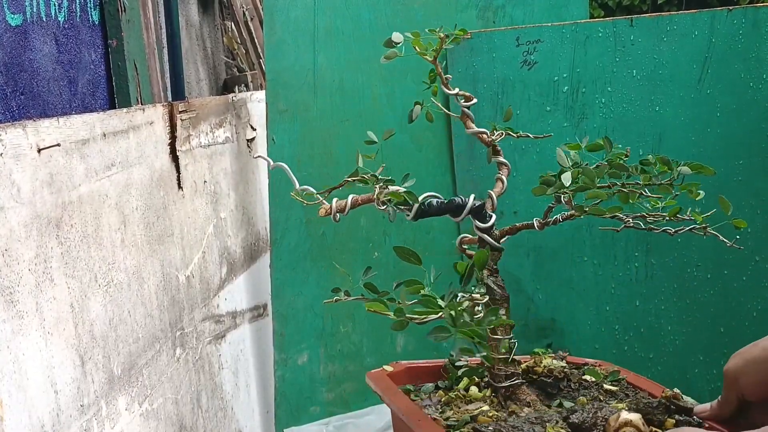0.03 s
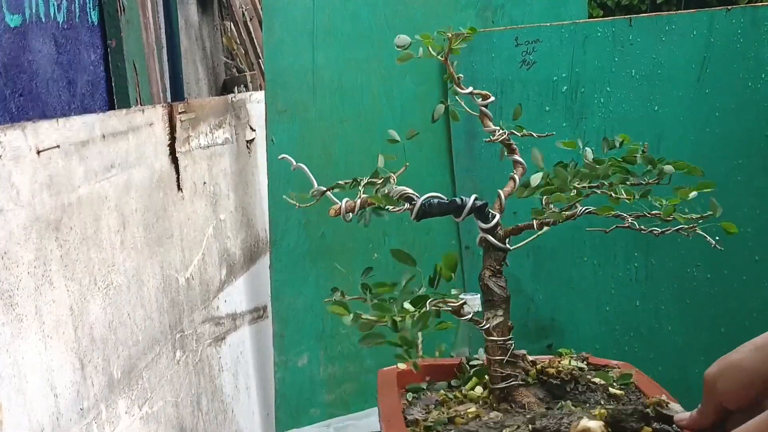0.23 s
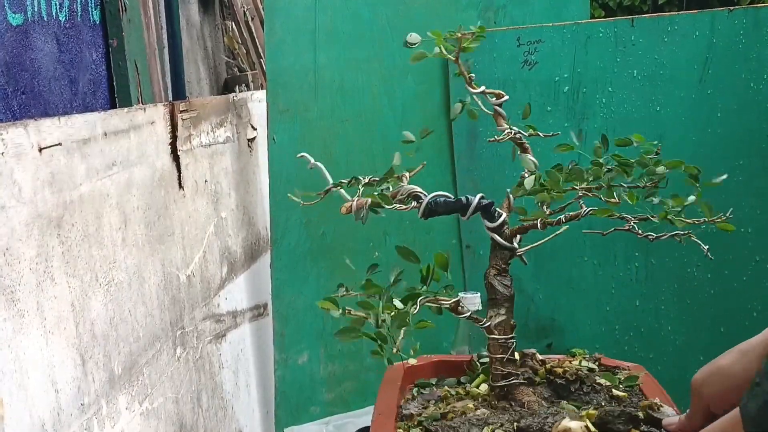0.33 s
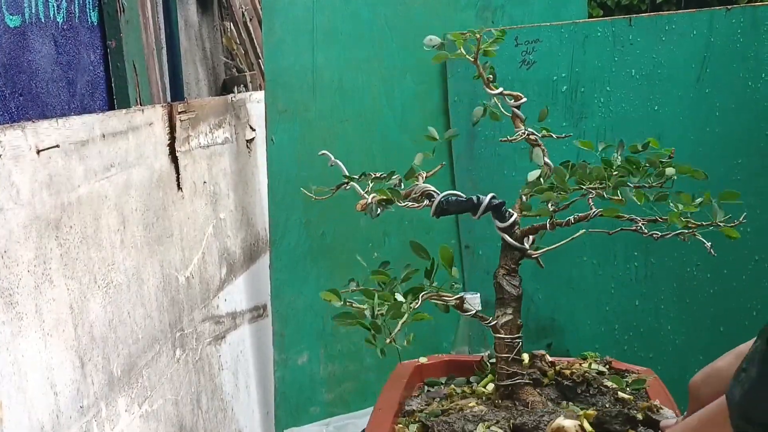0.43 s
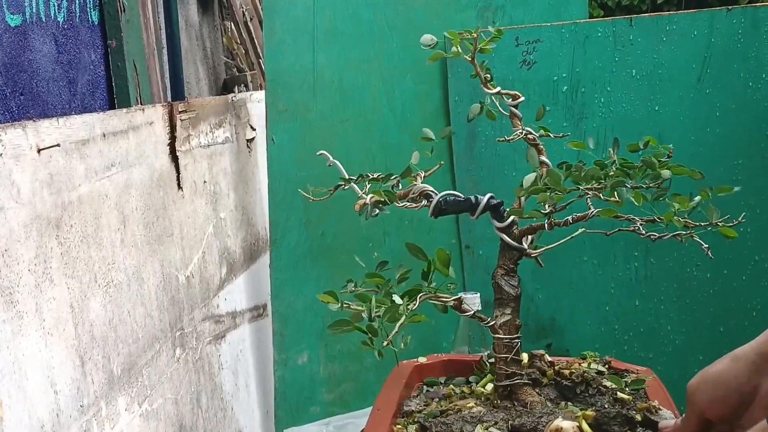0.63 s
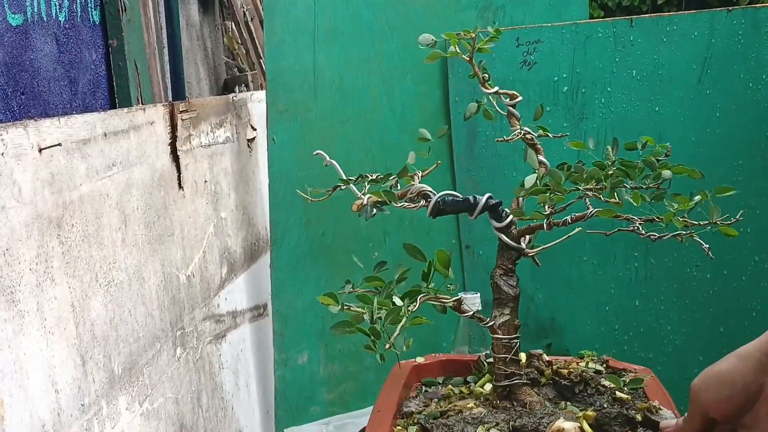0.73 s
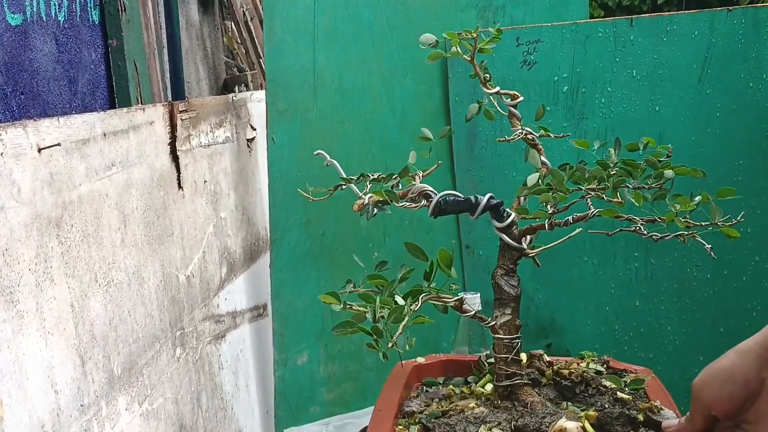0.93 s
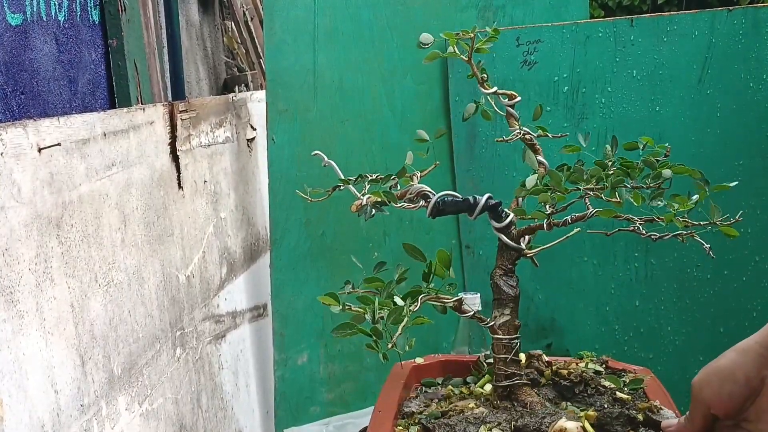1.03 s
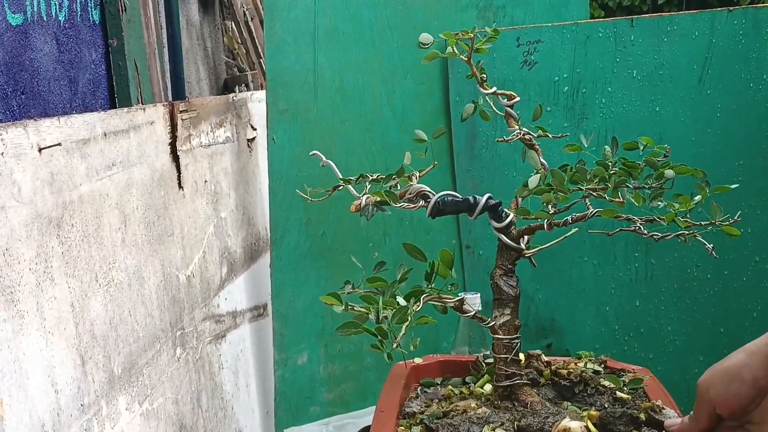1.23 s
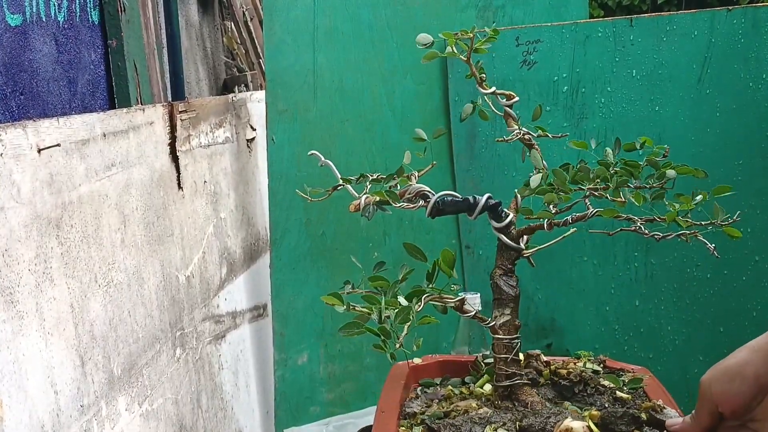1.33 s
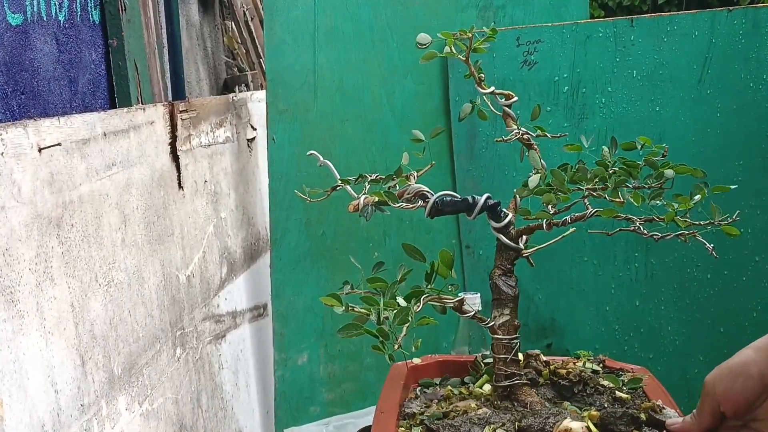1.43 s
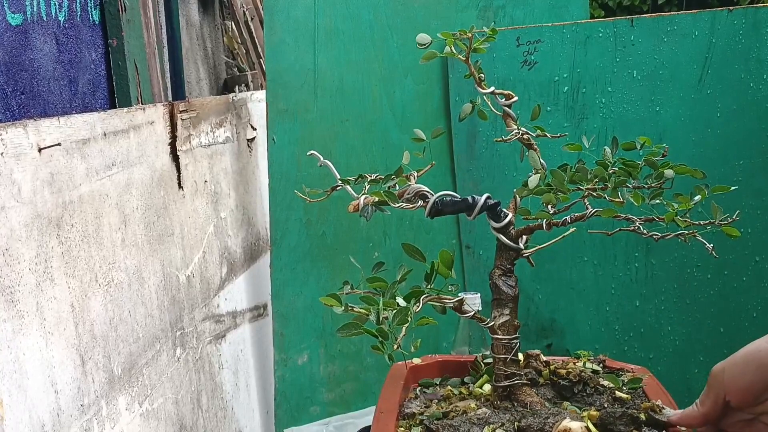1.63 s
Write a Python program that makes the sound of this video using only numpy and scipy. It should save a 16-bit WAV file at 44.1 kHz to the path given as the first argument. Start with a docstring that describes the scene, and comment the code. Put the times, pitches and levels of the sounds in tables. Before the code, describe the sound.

A soil-filled plant pot is set down on a table with one sharp knock, a gritty crack over a brief low boom. Before and after, its base judders and scrapes faintly, close by, over quiet room noise.

```python
"""A room with a table: a plant pot full of soil is shifted and set down with one sharp knock. The gritty base
cracks against the top, the table booms in its low modes, pot and room ring briefly. Before and after, the
turning base sticks and slips in soft judders and rubs over grit; the hand adds faint scrapes and the leaves
rustle. Gain control ducks the room noise under the knock and lets it creep back."""
import sys
import numpy as np
from scipy import signal
from scipy.fft import rfft, irfft
from scipy.io import wavfile
from scipy.ndimage import minimum_filter1d

SR = 44100
rng = np.random.default_rng(int(sys.argv[2]) if len(sys.argv) > 2 else 0)


def master(y):
    """Save y as 16-bit WAV."""
    cut = np.clip(np.atleast_2d(y).T, -1, 1)
    pcm = np.round(cut * 32767)  # scale
    wavfile.write(sys.argv[1], SR, pcm.astype(np.int16))


N = 74970
KNOCK_S, CUTOFF_HZ = 0.2492, 15900
SIDES = np.array([[1], [-1]])  # left, right

# Base contacts: after_knock_s, relative_db
BASE_CONTACTS = [(-.0019, -16.5), (-.0009, -16), (0.0, -2), (.0007, -3.5), (.0017, -8.5), (.004, -11.5),
                 (0.0147, -15.5), (0.028, -22)]
# Crack spectrum: freq_hz, density_db
CRACK_SPECTRUM = [(300, -14), (600, 0), (1000, -7.5), (1480, 0.5), (2060, -7.5), (2720, 1.5), (3270, -11),
                  (3900, 2), (4630, -7), (5580, -4), (6740, -11), (8000, -6), (9260, -7), (10100, -23),
                  (13100, -28), (15800, -27)]
# Uneven radiation of the pot: freq_hz, left_minus_right_db
POT_PAN = [(120, -1), (300, 1), (470, 1), (620, -5), (850, -2), (1400, 1.5), (2700, 2), (3800, -3.5),
           (5500, -1), (6400, -2), (7000, 0), (7900, -5), (9200, 2), (12000, 0)]


def base_crack():
    """Each contact of the gritty base is a bright burst of a few milliseconds."""
    attack_s, t60_s, low_cut_hz, gain_db = 0.00039, 0.006, 344, 4
    bursts = 0
    for after_knock_s, relative_db in BASE_CONTACTS:
        t = since(KNOCK_S + after_knock_s)
        bursts += from_db(relative_db) * ramp(t, attack_s) * decay(t, t60_s)
    grit = sum(band for _, band in noise_bands(CRACK_SPECTRUM, POT_PAN))
    highpass = signal.butter(2, low_cut_hz, "high", fs=SR, output="sos")
    return from_db(gain_db) * signal.sosfilt(highpass, bursts * grit + 1e-18)


# Loaded table top: pitch_hz, relative_db, t60_s
TABLE_TOP_MODES = [(111.3, -9, 0.2), (125.6, -13.5, 0.47), (145, -40, 0.037), (158.5, 2.5, 0.047),
                   (201.2, -10, 0.19), (338.6, -15.5, 0.25), (442.5, -16.5, 0.13), (480.4, -27, 0.47)]


def table_boom():
    """The pot's weight drives the table's low modes, neighbours in opposite directions."""
    lead_s, build_s, gain_db = 0.0019, 0.01, 5
    t = since(KNOCK_S - lead_s)
    modes = sum((-1) ** k * from_db(db) * ring_out(t, hz, t60_s) * np.sin(2 * np.pi * hz * t)
                for k, (hz, db, t60_s) in enumerate(TABLE_TOP_MODES))
    return from_db(gain_db) * ramp(t, build_s) * modes


# Pot modes: pitch_hz, relative_db, t60_s
POT_BODY_MODES = [(638, -14, .25), (711, -13, .22), (819, -10, .22), (908, -8, .22), (1010, -10, .22),
                  (1364, -3, .18), (1495, -4, .17), (1722, -5, .18), (1947, -7, .18), (2321, -3, .18),
                  (2730, -4, .15), (2820, -3, .15), (3650, -6, .12), (6410, -11, .14)]
# Dense ring of pot and room: freq_hz, density_db
RING_SPECTRUM = [(50, -8), (150, 3), (300, 1), (450, 3.5), (580, -4), (900, -2), (1100, -6), (1450, -1.5),
                 (2100, -8), (2750, -6), (3200, -14), (3900, -10.5), (4700, -15), (5500, -10), (8000, -16),
                 (9500, -16.5), (10000, -21), (13000, -32), (15500, -25)]
# Dense ring decay: freq_hz, t60_s
RING_DECAY = [(100, 0.46), (500, 0.29), (1500, .22), (4000, 0.22), (8000, 0.23), (15000, 0.23)]


def pot_ring():
    """The pot's modes reach the two sides out of step, inside a dense ring of pot and room."""
    modes_gain_db, dense_gain_db, build_s = -17.5, -8.5, 0.0075
    t = since(KNOCK_S)
    modes = 0
    for k, (hz, db, t60_s) in enumerate(POT_BODY_MODES):
        gain = from_db(modes_gain_db + db + SIDES * at_hz(POT_PAN, hz) / 2)
        apart_rad = (-1) ** k * np.arccos(at_hz(STEREO_CORRELATION, hz))
        phase = 2 * np.pi * (hz * t + rng.random()) + SIDES * apart_rad / 2
        modes += gain * ring_out(t, hz, t60_s) * np.sin(phase)
    dense = sum(band * ring_out(t, hz, at_hz(RING_DECAY, hz))
                for hz, band in noise_bands(RING_SPECTRUM, POT_PAN))
    return modes + from_db(dense_gain_db) * ramp(t, build_s) * dense


# Stick-slip spells: start_s, length_s, pitch_hz, level_db
BASE_JUDDERS = [(-.02, 0.051, 112, -35.5), (0.064, 0.056, 95.3, -32.5), (.108, 0.079, 124, -32.5),
                (0.17, 0.085, 121.7, -32), (0.857, 0.095, 90.4, -32), (0.98, 0.048, 85.6, -31),
                (1.179, .04, 118, -35.5), (1.304, 0.043, 119.8, -36.5)]


def base_judder():
    """The turning base sticks and slips with a low, uneven hum."""
    edge_s, octave_db = 0.018, -24
    wander = 1 + 0.035 * drift(rate_hz=23)
    rough_db = drift(rate_hz=6.7)
    out = 0
    for start_s, length_s, pitch_hz, level_db in BASE_JUDDERS:
        t = since(start_s)
        phase = 2 * np.pi * pitch_hz * np.cumsum(wander) / SR
        hum = np.sqrt(2) * (np.sin(phase) + from_db(octave_db) * np.sin(2 * phase))
        push = np.sin(np.pi / 2 * ramp(np.minimum(t, length_s - t), edge_s))
        out += from_db(level_db + rough_db) * push * hum
    return out


# Rubs: peak_s, sigma_s, level_db
GRIT_RUBS = [(0.121, 0.048, -49.5), (.402, 0.0069, -45), (0.888, .035, -47), (1.583, 0.014, -46)]
# Rub spectrum: freq_hz, density_db
GRIT_SPECTRUM = [(200, -25), (1400, 19.5), (3000, 11), (6000, 12.5), (10000, -4.5), (15000, -39)]


def grit_rub():
    """Grit under the base rubs in short swells of noise."""
    envelope = sum(from_db(db) * swell(peak_s, sigma_s) for peak_s, sigma_s, db in GRIT_RUBS)
    return envelope * sum(band for _, band in noise_bands(GRIT_SPECTRUM))


# Handling scrapes, with leaf rustles near 1.36 s: peak_s, sigma_s, centre_hz, level_db
SCRAPES_AND_RUSTLES = [(.008, .01, 2530, -48), (.136, 0.0025, 5200, -47.5), (.396, 0.0062, 10500, -53),
                       (.405, 0.0057, 4320, -53), (.635, 0.013, 2510, -49.5), (1.088, 0.0071, 2610, -49),
                       (1.327, .008, 14800, -59), (1.358, 0.012, 10650, -53.5), (1.366, 0.011, 9230, -52)]


def scrapes_and_rustles():
    """Brief, narrow puffs of treble as the hand moves the pot and the plant's leaves rustle."""
    width_octaves = 0.082
    out = 0
    for peak_s, sigma_s, centre_hz, level_db in SCRAPES_AND_RUSTLES:
        edges_hz = centre_hz * 2 ** (width_octaves * np.array([-0.5, 0.5]))
        bandpass = signal.butter(2, edges_hz, "band", fs=SR, output="sos")
        hiss = signal.sosfilt(bandpass, rng.standard_normal((2, N)))
        out += from_db(level_db) * swell(peak_s, sigma_s) * hiss / hiss.std()
    return out


# Room noise: freq_hz, density_db
ROOM_SPECTRUM = [(25, -19), (48, -11), (75, 2), (123, 2.5), (160, -7.5), (250, -6.5), (330, -13),
                 (730, -18), (1400, -19.5), (2700, -23.5), (6000, -28), (9600, -30), (11200, -43.5),
                 (13500, -45), (15300, -36.5)]


def room_noise():
    """Steady rumble and hiss, each octave flickering by about 1 dB."""
    level_db = -40
    return sum(band * from_db(level_db + drift(rate_hz=4.9)) for _, band in noise_bands(ROOM_SPECTRUM))


# Left-right likeness: freq_hz, correlation
STEREO_CORRELATION = [(60, .995), (130, 1), (290, 0.87), (640, 0.55), (1400, 0), (15000, 0)]


def noise_bands(spectrum, pan=((1000, 0),)):
    """Coloured stereo noise of rms 1, split into octaves: a list of (centre_hz, band)."""
    hz = np.maximum(np.arange(N // 2 + 1) * SR / N, 1)
    mid, side = rfft(rng.standard_normal((2, N)))
    alike = at_hz(STEREO_CORRELATION, hz)
    gain = from_db(at_hz(spectrum, hz) + SIDES * at_hz(pan, hz) / 2) * (hz > 20) * (hz < CUTOFF_HZ)
    coloured = gain * (np.sqrt(1 + alike) * mid + np.sqrt(1 - alike) * side * SIDES)
    coloured /= irfft(coloured, N).std()
    octave = np.round(np.log2(hz))
    return [(2 ** k, irfft(coloured * (octave == k), N)) for k in range(4, 15)]


# Onset of the faster fade: freq_hz, delay_s
FADE_DELAY = [(150, 0.084), (600, 0.11), (1400, 0.097), (3000, 0.071), (7000, 0.046), (15000, 0.025)]


def ring_out(t, hz, t60_s):
    """Free decay, then the ring is cut short by a faster fade, treble first."""
    fade_db_per_s = 305
    fading_s = np.maximum(t - at_hz(FADE_DELAY, hz), 0)
    return decay(t, t60_s) * from_db(-fade_db_per_s * fading_s)


def decay(t, t60_s):
    """Silence, then a fall of 60 dB per t60_s."""
    return (t >= 0) * from_db(-60 * np.maximum(t, 0) / t60_s)


def ramp(t, rise_s):
    """Linear rise from 0 to 1."""
    return np.clip(t / rise_s, 0, 1)


def swell(peak_s, sigma_s):
    """Gaussian envelope."""
    return np.exp(-0.5 * (since(peak_s) / sigma_s) ** 2)


def drift(rate_hz):
    """Slow random motion, standard deviation 1."""
    step, warmup = 40, 2000
    pole = np.exp(-2 * np.pi * rate_hz * step / SR)
    white = rng.standard_normal(N // step + warmup + 2)
    slow = signal.lfilter([1], [1, -2 * pole, pole * pole], white)[warmup:]
    return np.interp(np.arange(N) / step, np.arange(len(slow)), slow / slow.std())


def at_hz(table, hz):
    """Table lookup on a log-frequency axis."""
    freqs_hz, values = np.array(table).T
    return np.interp(np.log(hz), np.log(freqs_hz), values)


def since(start_s):
    """Seconds since start_s, per sample."""
    return np.arange(N) / SR - start_s


def from_db(db):
    """Decibels to gain."""
    return 10 ** (db / 20)


def scene():
    """The knock, the turning pot and the room."""
    knock = base_crack() + table_boom() + pot_ring()
    return knock + base_judder() + grit_rub() + scrapes_and_rustles() + room_noise()


def record(dry):
    """Gain control ducks at once, holds and slowly recovers; peaks clip; the top is cut."""
    threshold_db, max_duck_db = -22, 5
    window_s, hold_s, recovery_s = 0.002, 0.075, 0.22
    pole = np.exp(-1 / (window_s * SR))
    power = signal.lfilter([1 - pole], [1, -pole], np.mean(dry ** 2, axis=0))
    excess_db = np.clip(10 * np.log10(power + 1e-12) - threshold_db, 0, max_duck_db)
    recovery = np.exp(-since(0) / recovery_s)
    duck_db = np.maximum.accumulate(excess_db / recovery) * recovery
    hold = int(hold_s * SR)
    gain_db = minimum_filter1d(-duck_db, hold, origin=(hold - 1) // 2, mode="nearest")
    clipped = np.clip(dry * from_db(gain_db), -1, 1)
    lowpass = signal.ellip(10, 0.1, 70, CUTOFF_HZ, fs=SR, output="sos")
    return signal.sosfilt(lowpass, clipped)


dry = scene()
out = record(dry)
master(out)
```